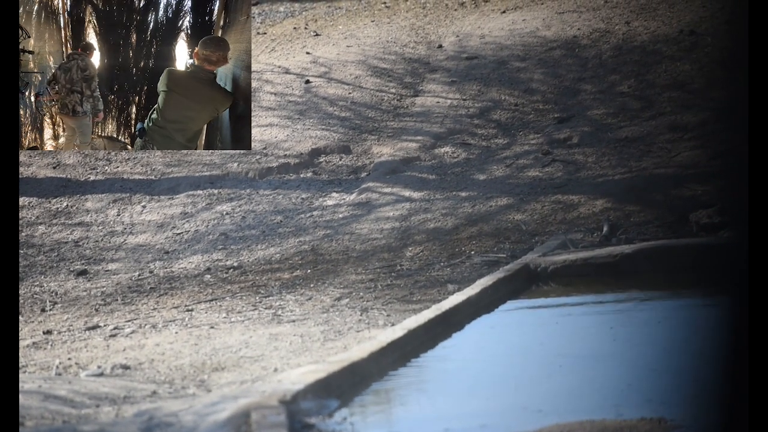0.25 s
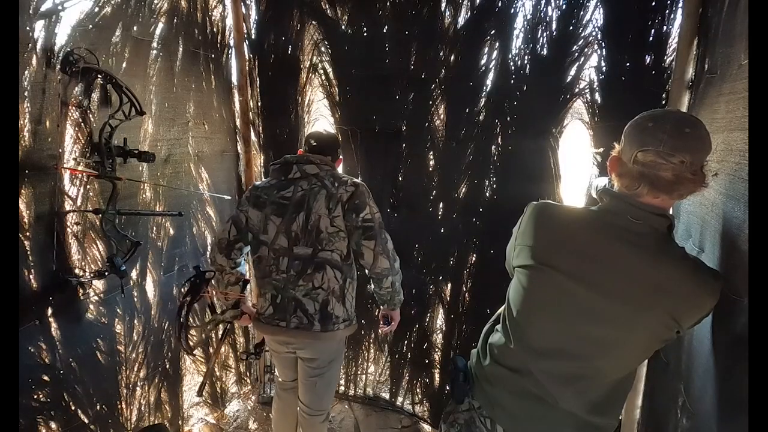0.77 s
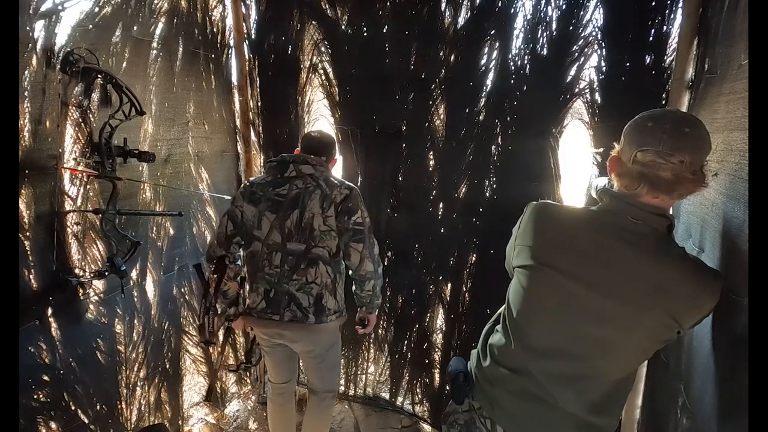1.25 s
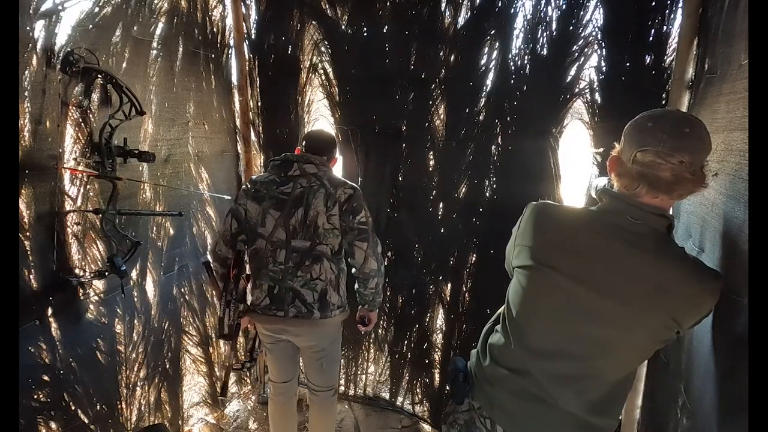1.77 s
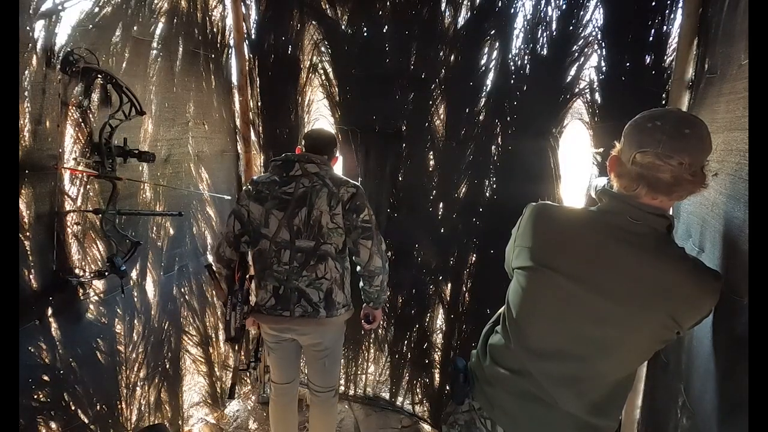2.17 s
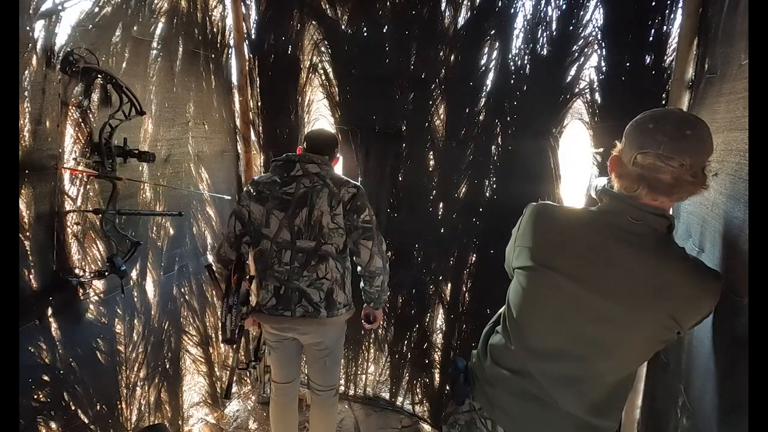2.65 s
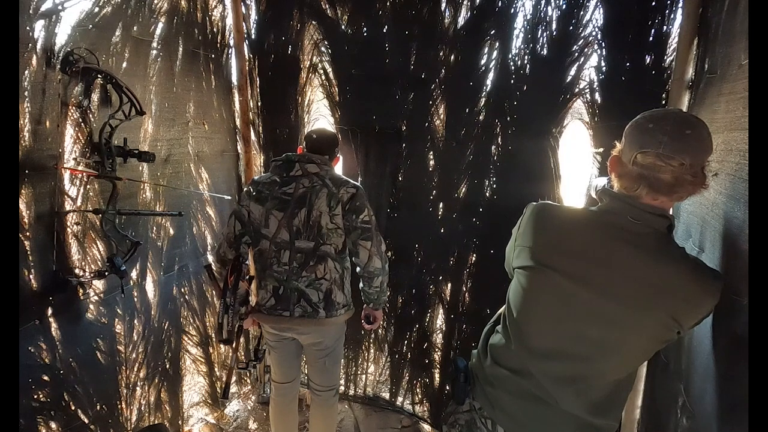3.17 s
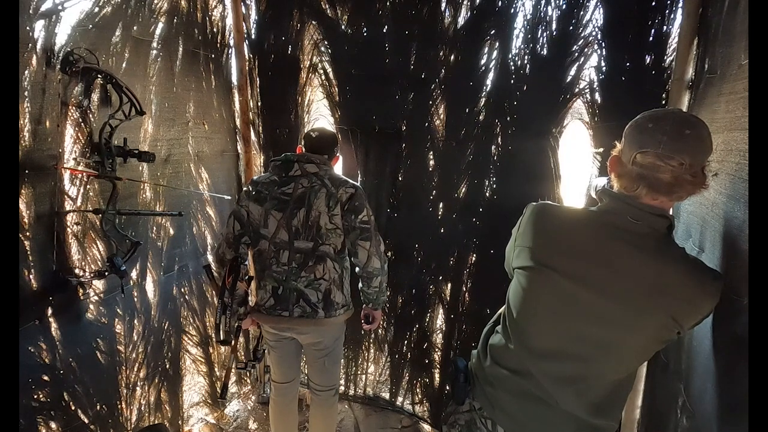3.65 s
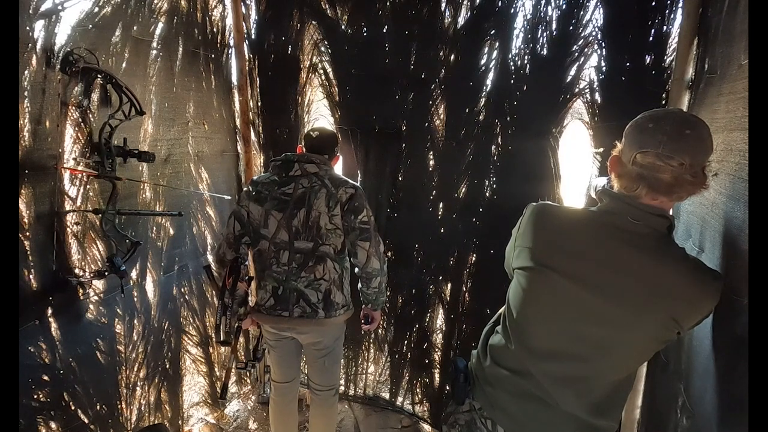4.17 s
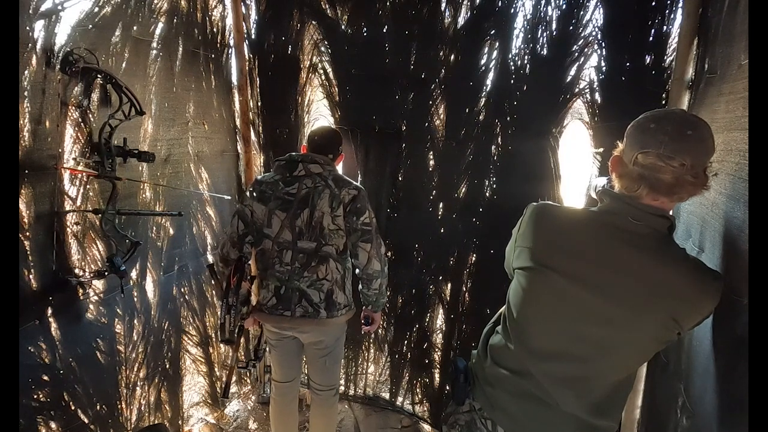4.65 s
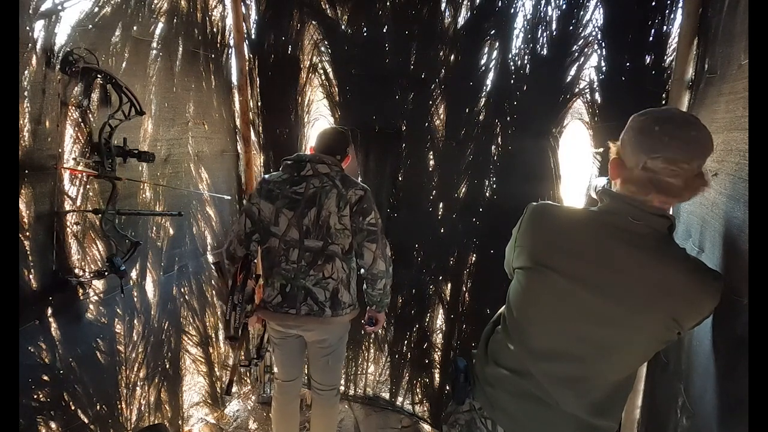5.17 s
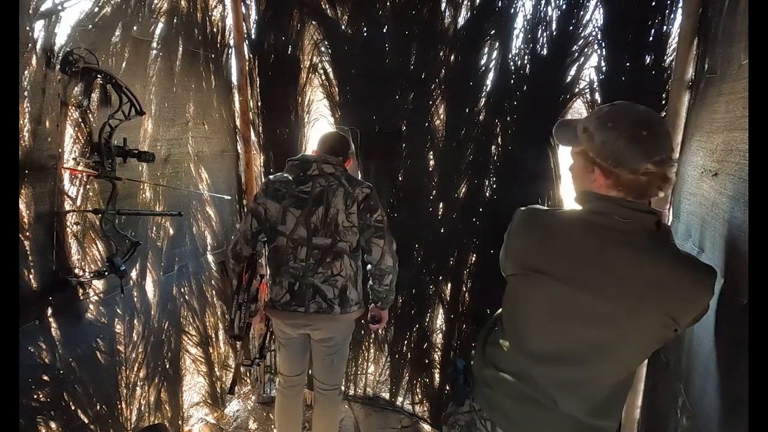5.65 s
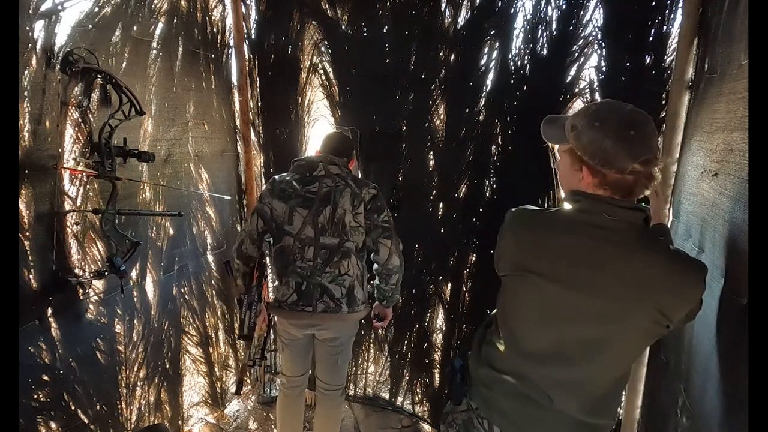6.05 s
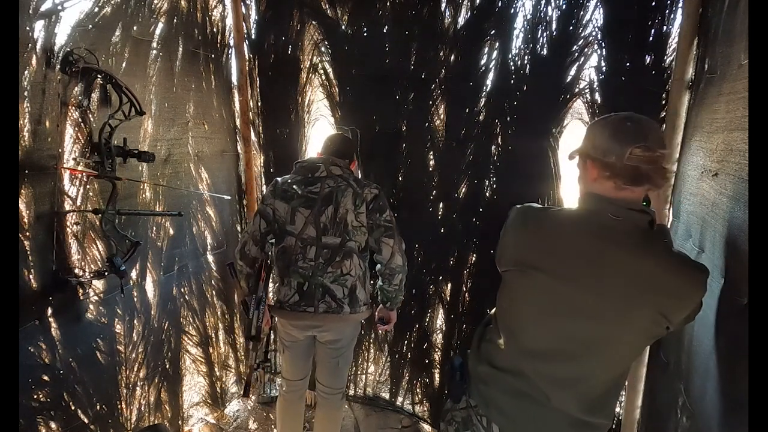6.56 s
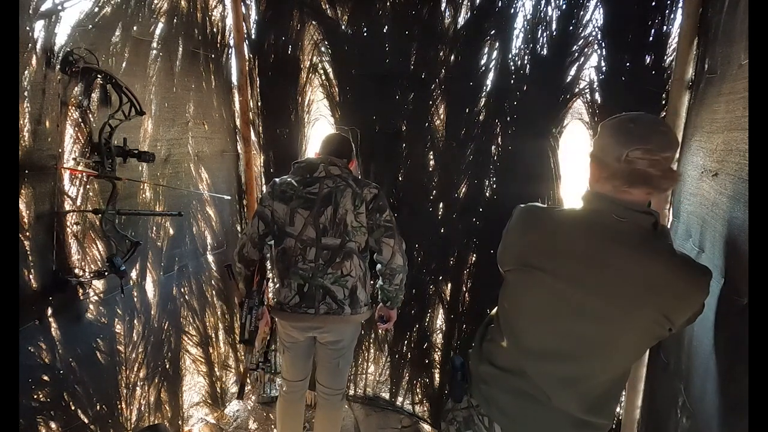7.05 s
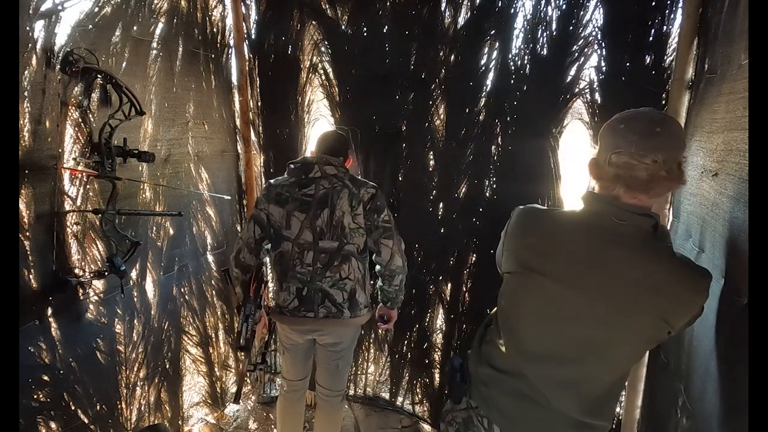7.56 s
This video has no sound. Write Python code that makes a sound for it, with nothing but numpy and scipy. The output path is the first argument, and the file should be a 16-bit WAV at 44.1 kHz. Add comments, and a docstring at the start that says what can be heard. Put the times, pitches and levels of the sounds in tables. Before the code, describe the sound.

Camera handling thuds and dry straw clatter settle into sparse light knocks, with high quick birdsong outside and a faint electronic whine early on.

```python
"""Bumps, footfalls, taps and rustles thin out inside a thatched hide at a waterhole in dry bush.
A camera is bumped and settled, a man steps over straw and shifts his bow, a jacket rustles: struck bodies
ring as damped modes, and straw and cloth give shaped bursts of noise. Finches outside whistle and chirp
on two gliding sines at once, over filtered noise for rumble, dry bush and hiss. A thin throbbing
electronic whine, two multiplied sines, runs through the first half."""
import sys
import numpy as np
from scipy import signal
from scipy.fft import rfft, irfft
from scipy.io import wavfile

SR = 44100
rng = np.random.default_rng(int(sys.argv[2]) if len(sys.argv) > 2 else 0)


def unload_wav(signal):
    """Save mono or channel-first audio to the path in sys.argv[1] as 16-bit WAV at rate SR, clipped to [-1, 1]."""
    wavfile.write(
        sys.argv[1],
        SR,
        np.round(np.clip(np.atleast_2d(signal).T, -1, 1) * 32767).astype(np.int16),
    )


N = 344101
TIME = np.arange(N) / SR
# the whine stops, scattered sound narrows and the treble turns duller here
TURN_S = 4.51


def from_db(db):
    """Amplitude ratio: 20 dB is a factor of ten."""
    return 10 ** (np.asarray(db) / 20)


def rms_one(x):
    """Normalise to unit root-mean-square amplitude."""
    return x / np.sqrt(np.mean(x ** 2) + 1e-20)


def add(track, s, sound):
    """Superposition: mix a sound in at a time."""
    i = int(np.clip(s * SR, 0, N - 1))
    track[..., i:i + sound.shape[-1]] += sound[..., :N - i]


def wander(t, per_s):
    """Random modulation: Gaussian points at a given rate, joined by straight lines."""
    return np.interp(t * per_s, np.arange(1024), rng.standard_normal(1024))


def colour(x, spectrum, size=2048):
    """Minimum-phase filtering: a folded cepstrum makes it causal; white noise keeps its power."""
    hz, db = np.transpose(spectrum)
    log_hz = np.log(np.fft.rfftfreq(size, 1 / SR) + 1)
    # 12 dB per octave of extra loss above the last point
    beyond = np.maximum(log_hz - np.log(hz[-1]), 0)
    log_gain = np.log(from_db(np.interp(log_hz, np.log(hz), db))) - 2 * beyond
    cepstrum = irfft(log_gain)[:size // 2]
    cepstrum[1:] *= 2
    pulse = irfft(np.exp(rfft(cepstrum, size)))
    pulse /= np.linalg.norm(pulse)
    return signal.fftconvolve(np.atleast_2d(x), pulse[None], axes=1)[:, :N]


def soften(x, hz):
    """Contact stiffness: a softer contact loses its top, here by a low-pass."""
    return signal.sosfilt(signal.butter(2, min(hz, SR / 3), fs=SR, output="sos"), x)


def scatter(x, t60):
    """Diffuse reflection off reeds and ground: a decaying noise tail, different at each ear."""
    t = np.arange(int((t60 + .005) * SR)) / SR
    tail = rng.standard_normal((2, len(t))) * from_db(-60 * t / t60) * (t > .001)
    tail /= np.linalg.norm(tail, axis=1, keepdims=True)
    return signal.oaconvolve(np.atleast_2d(x), tail, axes=1)[:, :N]


def shifting_scatter(x, t60, per_s=12, count=6):
    """Source position sets the reflections: sounds come from changing spots, so tails cross-fade."""
    # cubing lets one tail dominate at a time
    shares = np.array([wander(TIME, per_s) for _ in range(count)]) ** 3
    shares /= np.linalg.norm(shares, axis=0)
    return sum(share * scatter(x, t60) for share in shares)


def scattered_level():
    """Diffuse-to-direct ratio in dB: wide while the whine lasts, narrow afterwards."""
    return np.where(TIME < TURN_S, -2.5, -9)


def stereo_noise(side_db):
    """Interaural correlation: a common noise plus one that is opposite in the two ears."""
    mid, side = rng.standard_normal((2, N))
    return mid + from_db(side_db) * side * [[1], [-1]]


def rumble_level():
    """Power addition of a slowly settling floor and bouts of handling; in dB."""
    # the camera is handled or someone shifts his weight: start_s, length_s (until the fade), level_db
    handling = [(0, 0.042, -25), (0.27, 0.64, -33), (1.365, 0.18, -43), (3.977, 0.37, -51),
                (4.654, 0.062, -55.5), (5.507, 0.17, -55), (6.1, 0.11, -57)]
    start_db, settle_db_per_s = -48, 1.99
    rise_s, fade_s = 0.031, 0.098
    power = from_db(start_db - settle_db_per_s * TIME) ** 2
    t = np.arange(int(1.5 * SR)) / SR
    for s, length, db in handling:
        bout = np.minimum(t / rise_s, 1) * np.exp(-np.maximum(t - length, 0) / fade_s)
        add(power, s, (from_db(db) * bout) ** 2)
    return 10 * np.log10(power)


def background(rumble_db, bush_db, hiss_db):
    """Spectrally shaped noise: low rumble, rustle of dry bush and high hiss, the last two narrowing later."""
    # relative spectra of low rumble, dry bush and high hiss: frequency_hz, gain_db
    rumble_spectrum = [(22, -2), (55, 0), (150, -2.5), (260, -7), (600, -22.5)]
    bush_spectrum = [(300, -11.5), (750, -0.5), (1180, 7.5), (1600, 1.5), (2200, 2), (3500, -1.5),
                     (5000, -0.5), (8000, -46)]
    hiss_spectrum = [(3000, -11.5), (5000, -4.5), (6500, 1), (8500, -4), (10500, -9), (13500, -16.5),
                     (15000, -44)]
    side_db = scattered_level()
    rumble = colour(stereo_noise(-19.5), rumble_spectrum)
    rumble *= from_db(rumble_db + 2.33 * wander(TIME, 10))
    bush = colour(stereo_noise(side_db + 2.5), bush_spectrum)
    bush *= from_db(bush_db - 3.5 + 4.4 * wander(TIME, 25))
    hiss = colour(stereo_noise(side_db + 3.5), hiss_spectrum)
    hiss *= from_db(hiss_db - 6.0 + 0.55 * wander(TIME, 15))
    return rumble + bush + hiss


def whine(level_db=-60, pitch_hz=15740, beat_hz=4.6):
    """Beating: a high electronic tone times a slow sine throbs, then stops abruptly."""
    gate = np.clip((TURN_S - TIME) * 100, 0, 1)
    throb = np.sin(np.pi * beat_hz * TIME) * gate
    return from_db(level_db) * 2 * np.sin(2 * np.pi * pitch_hz * TIME) * throb


def notes(table, glide_hz_per_s, scoop_hz, scoop_s, swell_db, upper_ratio, upper_db, rasp, pan_db=0,
          break_s=0, waver=0.0017, upper_fade_db=0, flutter_db=2.5, octave_db=-29,
          attack_s=0.00515, release_s=0.046):
    """Two-voiced syrinx: each side sings a pitch, hoarse and off pitch at first, then on a steady glide.
    If the voice breaks, it jumps up and swoops a second time."""
    out = np.zeros(N)
    for s, length, pitch_hz, db in table:
        t = np.arange(int(max(length, .02) * SR)) / SR
        first_swoop = np.exp(-t / scoop_s) - .5
        last_swoop = np.exp(-abs(t - break_s) / scoop_s)
        scoop = scoop_hz * np.where(t < break_s, first_swoop, last_swoop)
        hoarse = rasp * np.exp(-t / .022) + .003
        unsteady = 1 + hoarse * wander(t, 900) + waver * wander(t, 35)
        voice_hz = (pitch_hz + glide_hz_per_s * t + scoop) * unsteady
        phase = 2 * np.pi * np.cumsum(voice_hz) / SR
        upper = from_db(upper_db + upper_fade_db * t / length + flutter_db * wander(t, 73))
        voices = np.sin(phase) + upper * np.sin(upper_ratio * phase)
        voices += from_db(octave_db) * np.sin(2 * phase)
        envelope = np.clip(np.minimum(t / attack_s, (t[-1] - t) / release_s), 0, 1)
        envelope *= from_db(swell_db * t / length)
        flutter = from_db(flutter_db * wander(t, 110.0))
        add(out, s, from_db(db) * rms_one(voices * envelope * flutter))
    return out * from_db([[pan_db], [-pan_db]])


def birds(hiss_db, thatch_db=-2.0, echo_db=-8.5, echo_t60=0.32, count=44):
    """Frequency-modulated song: finches near the water, a faint random flock and far calls."""
    # whistles that scoop up and keep climbing: start_s, length_s, level_db
    rising = [(1.87, 0.25, -46.5), (2.213, 0.26, -45.5), (3.103, 0.26, -48), (3.464, 0.26, -44.5),
              (3.803, 0.22, -59), (6.738, 0.23, -64.5), (7.073, 0.27, -63.5)]
    # whistles that sink: start_s, length_s, level_db
    falling = [(1.698, 0.17, -48.5), (2.021, 0.25, -53.5), (3.455, 0.17, -50), (6.57, 0.2, -69),
               (6.925, 0.23, -66)]
    # hoarse chirps: start_s, length_s, pitch_hz (before glide and swoop), level_db
    chirps = [(0.018, 0.051, 6470, -47), (0.222, 0.06, 6570, -46.5), (0.275, 0.07, 7050, -46),
              (0.345, 0.071, 7470, -46.5), (0.445, 0.054, 6420, -43), (0.622, 0.054, 6570, -42),
              (1.309, 0.085, 6590, -31.5), (4.87, 0.06, 6300, -65), (6.176, 0.085, 6700, -52)]
    # short husky rasps, lower than the chirps, near the start of a chirp or slur: start_s, level_db
    rasps = [(0.229, -54), (4.862, -63.5), (5.093, -65.5)]
    # soft upward slurs: start_s, length_s, pitch_hz (before glide and scoop), level_db
    slurs = [(1.885, 0.067, 6670, -47), (2.44, 0.069, 7900, -53), (2.54, 0.18, 6040, -54),
             (2.655, 0.063, 7550, -48.5), (2.96, 0.14, 6800, -54.5), (3.03, 0.12, 6670, -51),
             (3.505, 0.1, 6600, -46.5), (4.525, 0.08, 6970, -64), (4.65, 0.11, 6360, -66),
             (4.785, 0.068, 6930, -63), (4.96, 0.095, 6190, -69), (5.125, 0.073, 6900, -62),
             (5.222, 0.081, 7420, -61.5), (6.72, 0.081, 6330, -66)]
    # larger birds far away: start_s, length_s, pitch_hz (before glide and scoop), level_db
    far_calls = [(2.81, 0.12, 3500, -69), (3.04, 0.09, 3630, -65), (3.19, 0.09, 3800, -65),
                 (7.65, 0.14, 3560, -73), (7.74, 0.1, 2230, -70)]
    rising_hz, falling_hz, rasp_hz, rasp_s = 5860, 5535, 4130, 0.04
    climb_hz_per_s = 6500  # shared by chirps and slurs
    flock_db = -8  # relative to the hiss level curve

    song = notes([(s, length, rising_hz, db) for s, length, db in rising],
                 glide_hz_per_s=2700, scoop_hz=-620, scoop_s=.04, swell_db=11.0,
                 upper_ratio=1.31, upper_db=0.0, upper_fade_db=-17.0, rasp=0.024, pan_db=0.5)
    song += notes([(s, length, falling_hz, db) for s, length, db in falling],
                  glide_hz_per_s=-2200, scoop_hz=150, scoop_s=0.0278, swell_db=-1.0,
                  upper_ratio=1.5, upper_db=-32, rasp=0.0021, pan_db=-0.5)
    song += notes(chirps, glide_hz_per_s=climb_hz_per_s, scoop_hz=720, scoop_s=0.00724, break_s=0.02,
                  swell_db=-1.5, upper_ratio=1.26, upper_db=-9.0, rasp=0.035, flutter_db=0.5,
                  pan_db=-2.5, attack_s=0.013, release_s=0.01)
    song += notes([(s, rasp_s, rasp_hz, db) for s, db in rasps],
                  glide_hz_per_s=0, scoop_hz=-200, scoop_s=.01, swell_db=7,
                  upper_ratio=1.3, upper_db=-3, rasp=0.083)
    flock = [(when * TIME[-1], 0.052 + 0.056 * long, 6000 + 800 * high, hiss_db[int(when * N)] + flock_db)
             for when, long, high in rng.random((count, 3))]
    song += notes(list(slurs) + flock, glide_hz_per_s=climb_hz_per_s, scoop_hz=-56, scoop_s=.02,
                  swell_db=1.5, upper_ratio=1.275, upper_db=-11.0, rasp=0.017, flutter_db=1.5,
                  release_s=0.015, pan_db=1.0)
    song += notes(far_calls, glide_hz_per_s=-1900, scoop_hz=-300, scoop_s=.03, swell_db=0,
                  upper_ratio=2, upper_db=-30, rasp=.02, waver=.013)
    # the song comes in through several gaps in the thatch, then dies away in the bush
    thatch = from_db(thatch_db) * scatter(song.mean(0), t60=.025)
    echo = from_db(echo_db) * scatter(song.mean(0), echo_t60)
    return song + thatch + echo


def straw_ticks(bush_db, per_s=36, above_db=5.5, treble_db=-1.5):
    """Poisson crackle: tiny random noise bursts of straw and cloth; gives the drive of body and treble."""
    spread_db, crumble_s = 3.8, .005
    tick_db = bush_db + above_db + spread_db * np.clip(rng.standard_normal(N), -2, 2)
    clicks = (rng.random(N) < per_s / SR) * from_db(tick_db)
    # the tiny offset keeps the recursive decay out of denormal numbers
    decay = signal.lfilter([1], [1, -np.exp(-1 / (crumble_s * SR))], clicks + 1e-18)
    return decay * rng.standard_normal(N) * np.array([[1], [from_db(treble_db)]])


def scuffs(trim_db=1.34, dull_hz=4200, catches_per_s=260, rise_s=0.0061, fade_s=0.015):
    """Stick-slip friction: fibres catch and slip many times a stroke; gives the drive of body and treble."""
    # cloth and straw: start_s, length_s, level_db (before trim), treble_db (re level)
    strokes = [(0.668, 0.071, -33, -1), (0.738, 0.15, -47, 6), (0.783, 0.018, -31, -10),
               (1.054, 0.094, -39.5, -2.5), (1.568, 0.044, -37, -3.5), (1.628, 0.09, -46.5, 2.5),
               (2.045, 0.063, -47, 12), (3.469, 0.095, -48.5, -2), (4.45, 0.043, -57, -4.5),
               (5.532, 0.067, -47.5, -4.5), (5.633, 0.066, -51.5, -3.5), (5.939, 0.092, -49, -9),
               (6.437, 0.043, -51.5, -5), (6.516, 0.05, -59, 0), (6.909, 0.064, -56.5, 8.5),
               (7.301, 0.035, -65, 3), (7.481, 0.088, -66, 5)]
    catch_db, grain_db = 4.6, 4.8
    out, t = np.zeros((2, N)), np.arange(SR // 3) / SR
    for s, length, db, bright_db in strokes:
        noise = rng.standard_normal(len(t))
        roughness_db = grain_db * rng.standard_normal(len(t)) + catch_db * wander(t, catches_per_s)
        grains = noise * from_db(roughness_db)
        stroke = np.minimum(t / rise_s, 1) * np.exp(-np.maximum(t - 0.86 * length, 0) / fade_s)
        rub = from_db(db + trim_db) * rms_one(grains) * stroke
        body = soften(rub, dull_hz * from_db(bright_db / 2))
        add(out, s, np.array([body, from_db(bright_db) * rub]))
    return out


def taps(trim_db=-0.88, treble_trim_db=1.0, crack_s=0.0015, tail_s=0.0065, tail_db=-16, rebound_db=-10,
         ring_db=-2.0, ring_width_hz=520, dull_ratio=1.74, rise_s=0.00034):
    """Impact and resonance: gritty crack, lighter second contact, crumbling tail and a brief ring.
    Gives the drive of body and treble."""
    # gear and straw snaps: start_s, level_db, treble_db (re level; both before trim), ring pitch_hz
    hits = [(0.249, -34, -18, 1870), (0.378, -32, -30, 1690), (0.397, -30, -22, 1040),
            (0.434, -32.5, 4, 3700), (0.532, -24.5, -12.5, 1860), (0.688, -26.5, -27, 1510),
            (0.705, -28.5, -20, 1900), (1.07, -33.5, -4.5, 1930), (1.1, -25.5, -18, 2220),
            (1.162, -37.5, -12, 2000), (1.212, -40, -22, 1913), (1.333, -34.5, -12, 2930),
            (1.444, -30, -14, 2940), (1.478, -35.5, -6, 1980), (1.677, -42, 5.5, 4900),
            (2.266, -51.5, 11.5, 4700), (2.654, -43.5, 6, 3870), (3.444, -44.5, -6, 2570),
            (3.489, -38.5, -18, 2380), (3.521, -37.5, -7, 2040), (3.532, -46, 0, 4200),
            (3.588, -40, -9, 1110), (3.606, -43.5, -12, 1010), (3.625, -44.5, -10, 950),
            (4.013, -42, -10.5, 2080), (4.076, -42, -28, 1420), (4.115, -40.5, -15, 2130),
            (4.214, -40, -25, 3020), (4.295, -39.5, -14, 2180), (4.336, -44, -17, 3570),
            (4.376, -41.5, -26, 1890), (4.387, -36, -17.5, 3240), (5.115, -56, -20, 1090),
            (5.136, -60, -23, 1090), (5.173, -58.5, -7, 1220), (5.244, -53, -13, 1150),
            (5.261, -53.5, -6, 1170), (5.3, -48, 6, 4970), (5.384, -54, -5, 1190),
            (5.399, -42.5, -7.5, 1210), (5.934, -46.5, -7, 2020), (5.965, -41, -14, 2000),
            (6.195, -51, -10, 1740), (6.307, -43, -12, 1430), (6.341, -44, -14, 1260),
            (6.439, -50, -8, 1700), (6.502, -52, -2, 2140), (6.541, -50, -3.5, 2500),
            (6.824, -56, -2, 1410), (7.517, -51.5, -1.5, 2600)]
    out, t = np.zeros((2, N)), np.arange(SR // 8) / SR
    for s, db, bright_db, hz in hits:
        grit = rng.standard_normal(len(t)) * from_db(2.0 * rng.standard_normal(len(t)))
        rebound_s = rng.uniform(0.0073, 0.01464)
        rebound = from_db(rebound_db) * np.exp(-abs(t - rebound_s) / crack_s)
        tail = from_db(tail_db) * np.exp(-t / tail_s)
        hit = grit * (np.exp(-t / crack_s) + rebound + tail)
        hit *= 1 - np.exp(-t / rise_s)
        hit /= np.std(hit[:SR // 100])
        ring = signal.lfilter(*signal.iirpeak(hz, hz / ring_width_hz, fs=SR), hit)
        body = soften(hit, dull_ratio * hz) + from_db(ring_db) * ring
        treble = from_db(bright_db + treble_trim_db) * hit
        add(out, s, from_db(db + trim_db) * np.array([body, treble]))
    return out


def movement(bush_db, pan_db=1.13):
    """Direct and diffuse sound of taps, scuffs and ticks off reed walls; weight wakes a hollow woody knock."""
    # relative spectra of body, treble and woody knock: frequency_hz, gain_db
    body_spectrum = [(150, -14.5), (400, -2.5), (750, -3.5), (1150, 3.5), (1700, 2), (2200, 2.5),
                     (2800, -1.5), (3500, -2), (5000, -15.5), (9000, -33.5)]
    treble_spectrum = [(2200, -34), (3700, 0), (6500, 0), (8800, 1.5), (11000, -6), (15500, -18)]
    wood_spectrum = [(140, -26), (420, -3.5), (740, -3), (950, -8.5), (1400, -19)]
    # as the man walks off to the left, the left ear's lead grows; later the lead is gone
    lead_start_ms, lead_end_ms, walk_s, lead_until_s = 0.091, 0.26, 1.47, 3.9
    heavy_from_s, heavy_to_s, light_db, heavy_db = 3.4, 5.3, -11.5, 2
    lead_ms = lead_end_ms + (lead_start_ms - lead_end_ms) * np.exp(-TIME / walk_s)
    lead_ms *= TIME < lead_until_s
    weight_db = np.where((TIME > heavy_from_s) & (TIME < heavy_to_s), heavy_db, light_db)

    body, treble = taps() + scuffs() + straw_ticks(bush_db)
    near = (colour(body, body_spectrum) + colour(treble, treble_spectrum))[0]
    knock = shifting_scatter(body * from_db(weight_db), t60=0.03)[0]
    near += colour(knock, wood_spectrum)[0]
    direct = np.array([near, np.interp(TIME - lead_ms / 1000, TIME, near)])
    wet = from_db(scattered_level())
    # the division keeps the summed power of direct and scattered sound
    heard = (direct + wet * shifting_scatter(near, t60=0.018)) / np.sqrt(1 + wet ** 2)
    heard += from_db(-13.5) * scatter(near, t60=0.39)
    return heard * from_db([[pan_db], [-pan_db]])


def rebounds(count=3):
    """Restitution: each bump rebounds weaker at uneven gaps; rows of start_s, level_db, hardness_db."""
    # dull bumps and footfalls: start_s, level_db, hardness_db (upper modes against lower ones)
    bumps = [(0.003, -14, -7), (0.034, -19, -2.5), (0.064, -14.5, -2), (0.181, -28, -18.5),
             (0.25, -25.5, -6.5), (0.335, -20.5, -13.5), (0.392, -15.5, -4.5), (0.42, -18.5, -6.5),
             (0.458, -15.5, -13.5), (0.53, -22.5, -17), (0.612, -18.5, -12), (0.671, -19.5, -13),
             (0.687, -16, 0.5), (0.821, -20.5, -20), (0.866, -20, -6), (0.935, -17.5, -15),
             (1.425, -32.5, -15), (1.896, -38, -3.5), (2.584, -46, -9), (2.631, -44, -4), (2.649, -39, -9),
             (2.701, -42.5, -2.5), (2.752, -44.5, -6), (2.965, -49.5, -4), (3.049, -45, 2.5),
             (3.163, -47.5, -0.5), (3.337, -44, -7), (3.489, -33, -3.5), (4.039, -40.5, -11),
             (4.091, -38, -27), (4.118, -37.5, -1), (4.156, -35.5, -15), (4.244, -37.5, -10),
             (4.298, -41.5, 3), (4.388, -41.5, 1), (4.983, -47, -3.5), (5.047, -41.5, -7.5),
             (5.116, -39, -1.5), (5.171, -46, -10), (5.561, -45.5, -3), (6.321, -48, -18), (6.76, -46, -8),
             (7.612, -51.5, -9)]
    gap_s, basic_loss_db = 0.021, 6
    hardness_saves = 0.8  # dB less loss per dB of hardness
    rows = []
    for s, db, hard_db in bumps:
        loss_db = max(basic_loss_db - hardness_saves * hard_db, 2)
        delays = np.cumsum(gap_s * rng.uniform(.7, 1.3, count))
        rows += [(s + delay, db - k * loss_db, hard_db) for k, delay in enumerate([0, *delays])]
    return rows


def thumps(rumble_db, detune=0.1286, split_hz=260, rise_s=0.00037, spread_db=5.0, count=50):
    """Modal synthesis: bumps and soft shuffles excite damped low modes, a little differently every time."""
    # modes before random detuning: frequency_hz, level_db, t60_s
    modes = [(56.2, -15.5, 0.31), (96, -10, 0.17), (138.6, -4.5, 0.15), (212.6, -1.5, 0.06),
             (305.6, -3, 0.11), (381.6, -1, 0.065), (531, -1, 0.029), (660, -14, 0.03), (900, -15.5, 0.018)]
    out, t = np.zeros(N), np.arange(SR // 5) / SR
    hz, db, t60 = np.transpose(modes)[:, :, None]
    rings = from_db(db - 60 * t / t60) * (1 - np.exp(-t / rise_s))
    shuffles = [(when * TIME[-1], rumble_db[int(when * N)] + spread_db * size, -1)
                for when, size in rng.random((count, 2))]
    for s, blow_db, hard_db in shuffles + rebounds():
        pitch, strength = rng.standard_normal((2, len(hz), 1))
        swing = np.sin(np.float32(2 * np.pi * hz * np.exp(detune * pitch) * t))
        gains = from_db(1.3 * strength + hard_db * (hz > split_hz)) * rng.choice([-1, 1], hz.shape)
        blow = (gains * rings * swing).sum(0)
        # the level refers to the first 15 ms
        add(out, s, from_db(blow_db) * blow / np.sqrt(np.mean(blow[:SR // 66] ** 2)))
    high_pass = signal.butter(2, 320, "high", fs=SR, output="sos")
    around = signal.sosfilt(high_pass, scatter(out, t60=0.13))
    return out + from_db(-10.0) * around


def scene():
    """Superposition of bumps, movement, birds, background and whine."""
    # level curves of dry rustle and high hiss, before the trims in background(): time_s, level_db
    rustle_curve = [(0.0, -47), (0.32, -50), (0.63, -46), (2.71, -58), (4.34, -56.5), (4.54, -73.5),
                    (5.21, -69.5), (5.52, -57.5), (5.87, -62.5), (7.34, -70.5), (7.8, -70)]
    hiss_curve = [(0.0, -45.5), (0.28, -59), (0.41, -45), (1.74, -48.5), (2.19, -44), (3.19, -52.5),
                  (3.54, -50), (3.71, -58.5), (4.48, -57), (4.56, -61.5), (6.04, -63), (7.15, -58.5),
                  (7.8, -61.5)]
    rumble_db = rumble_level()
    bush_db = np.interp(TIME, *np.transpose(rustle_curve))
    hiss_db = np.interp(TIME, *np.transpose(hiss_curve))
    sources = thumps(rumble_db) + movement(bush_db) + birds(hiss_db)
    return sources + background(rumble_db, bush_db, hiss_db) + whine()


def record(dry, dull_hz=7300, dull_db=-12, top_hz=11000, top_db=-5, cutoff_hz=16100):
    """Band-splitting: the treble turns duller when the whine stops; the very top is always cut steeply."""
    for hz, db in (dull_hz, dull_db), (top_hz, top_db):
        low = signal.sosfiltfilt(signal.butter(4, hz, fs=SR, output="sos"), dry)
        dry = low + (dry - low) * from_db(db * (TIME > TURN_S))
    return signal.sosfilt(signal.ellip(12, .1, 80, cutoff_hz, fs=SR, output="sos"), dry)


dry = scene()
out = record(dry)
unload_wav(out)
```